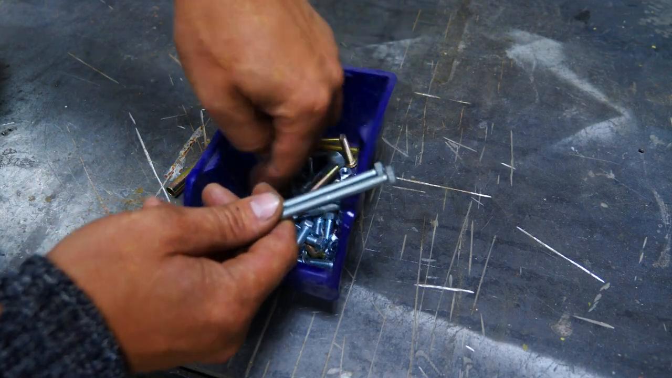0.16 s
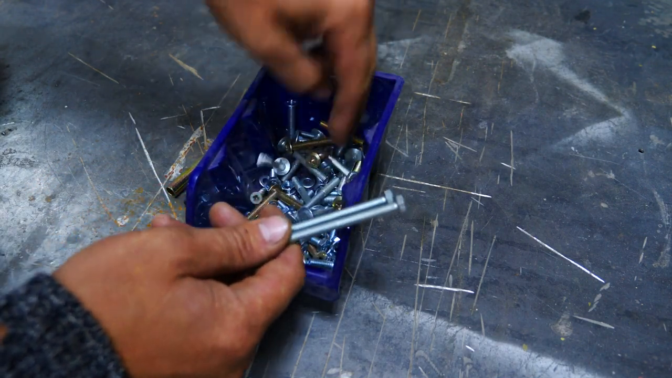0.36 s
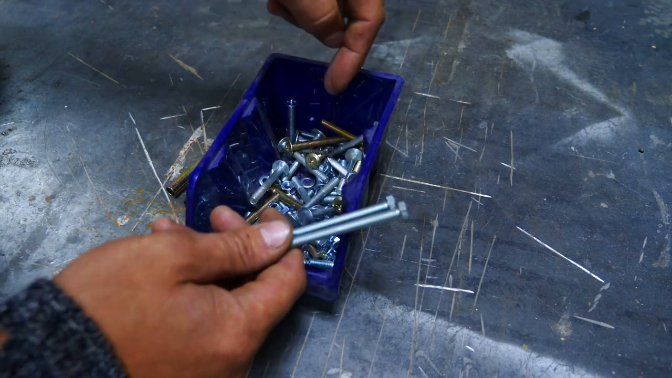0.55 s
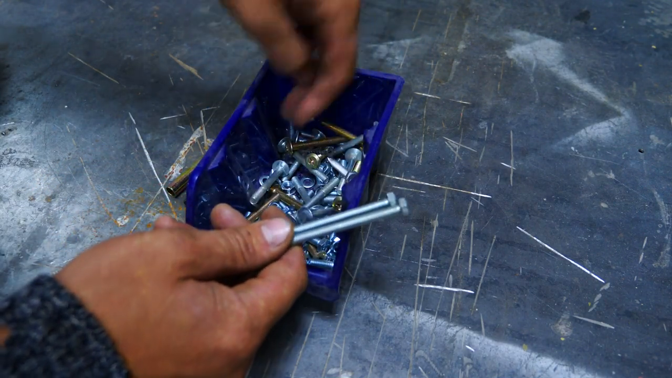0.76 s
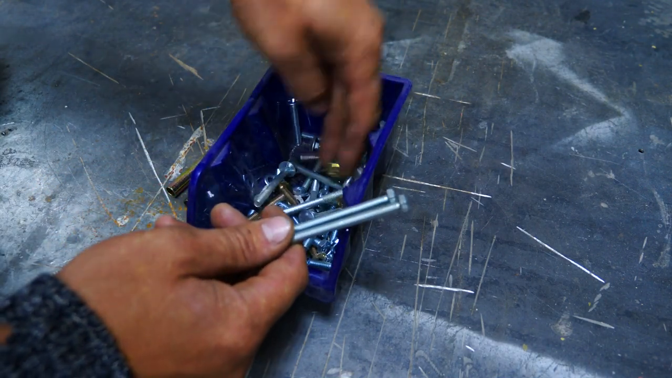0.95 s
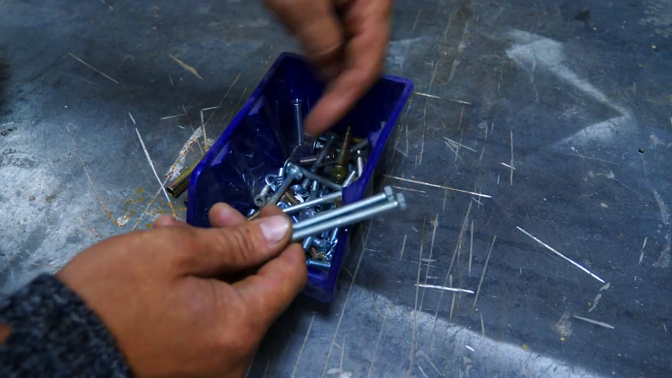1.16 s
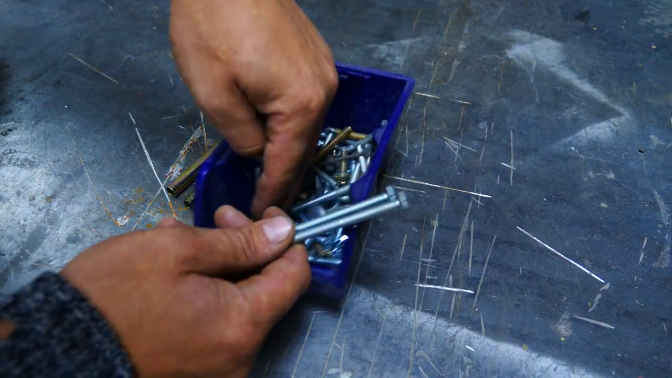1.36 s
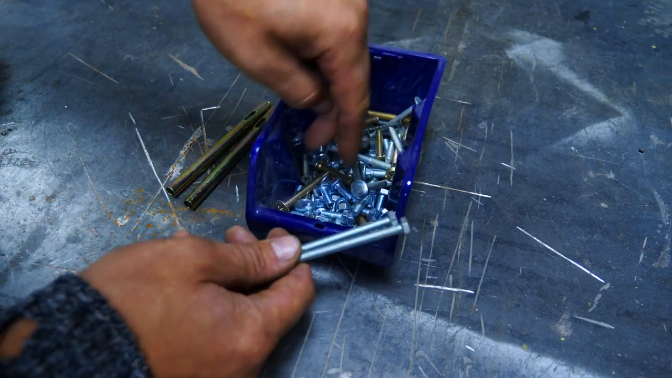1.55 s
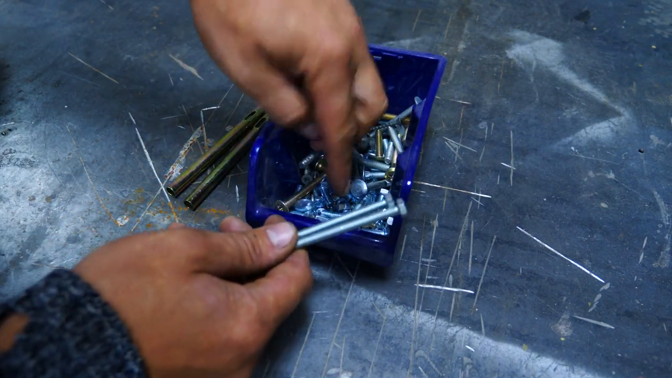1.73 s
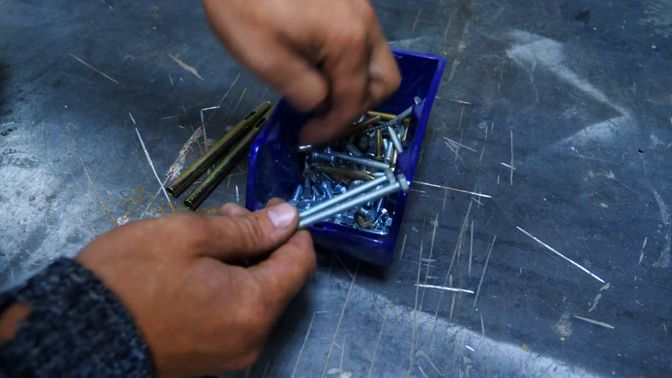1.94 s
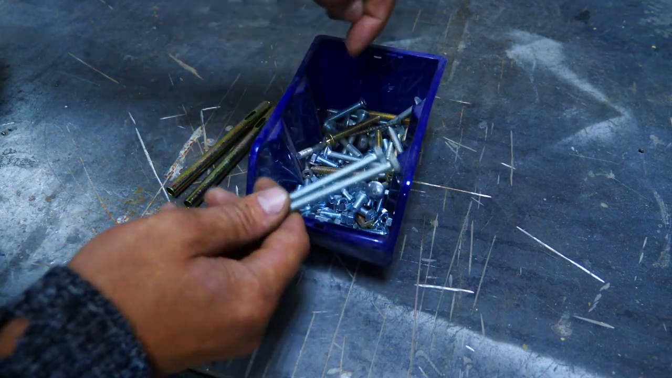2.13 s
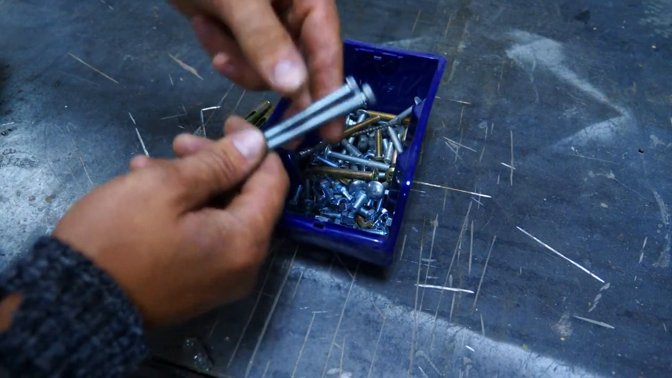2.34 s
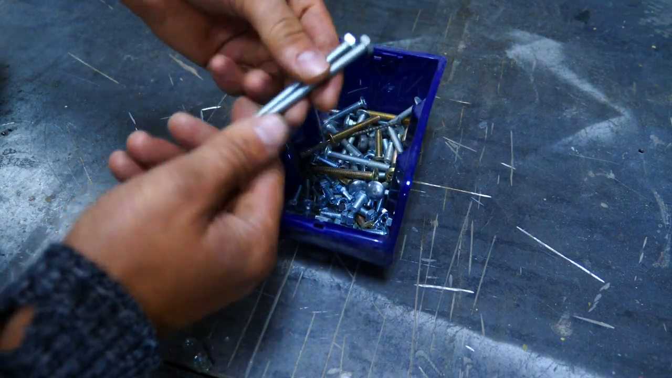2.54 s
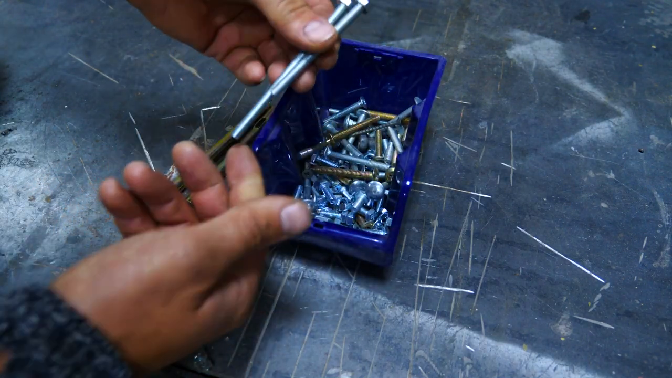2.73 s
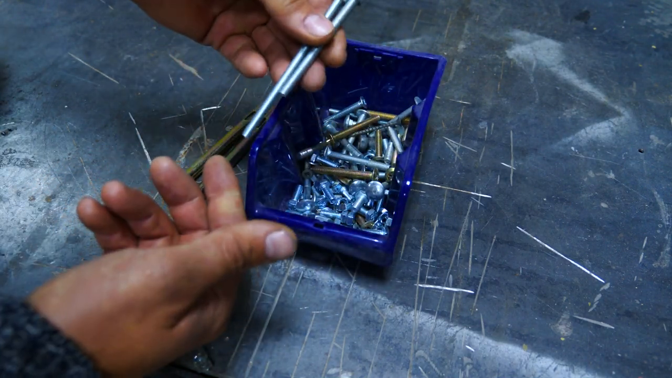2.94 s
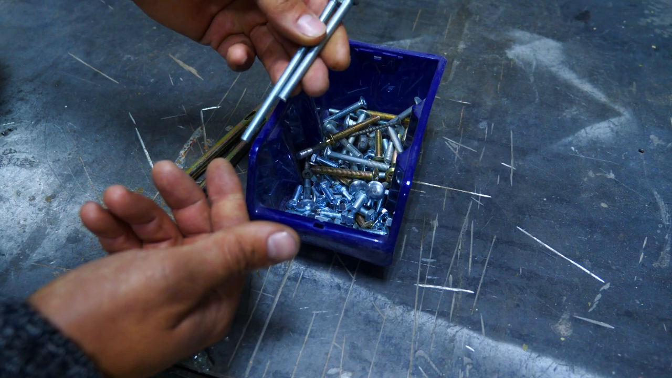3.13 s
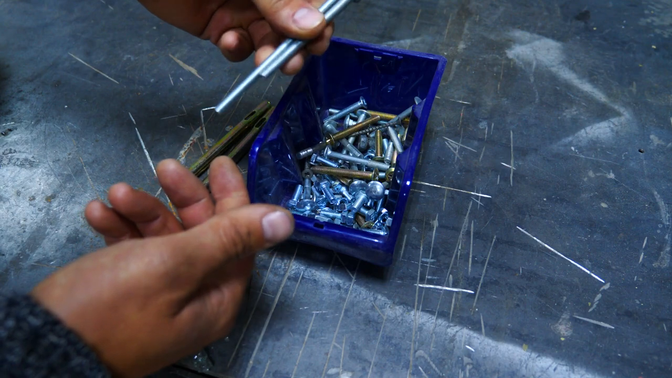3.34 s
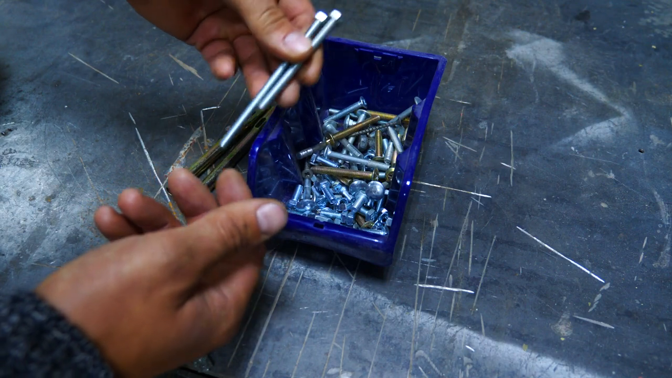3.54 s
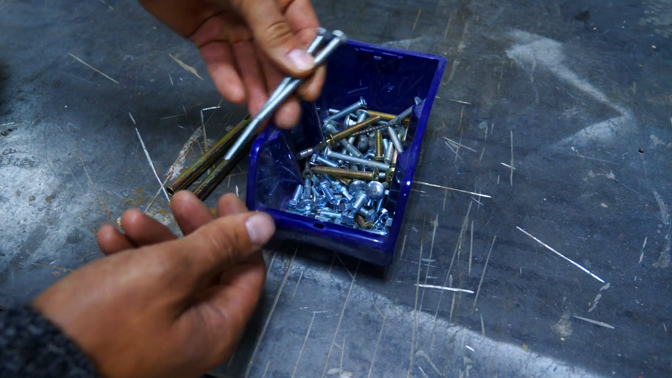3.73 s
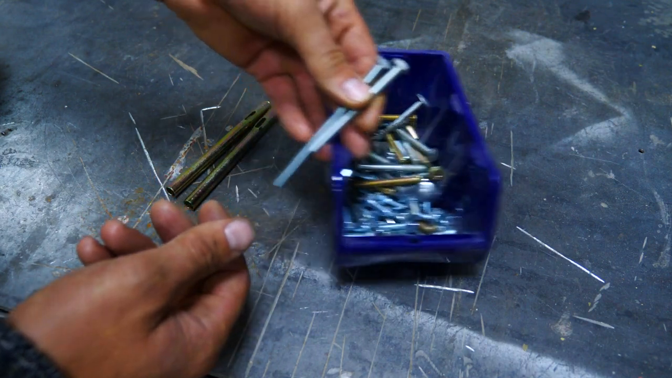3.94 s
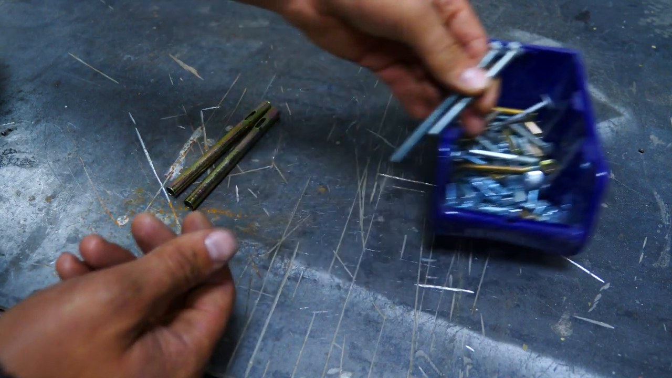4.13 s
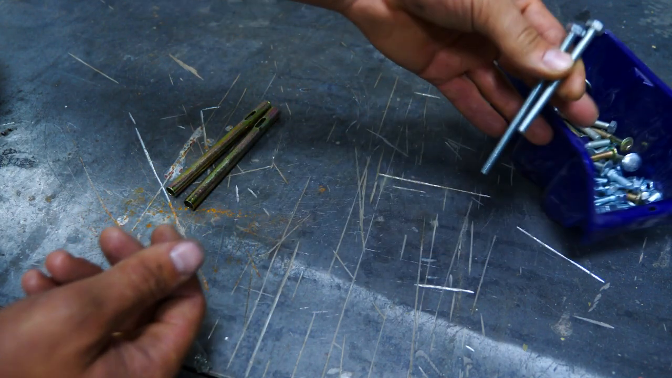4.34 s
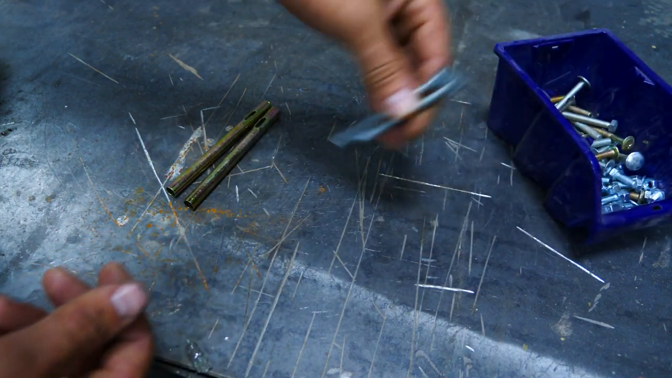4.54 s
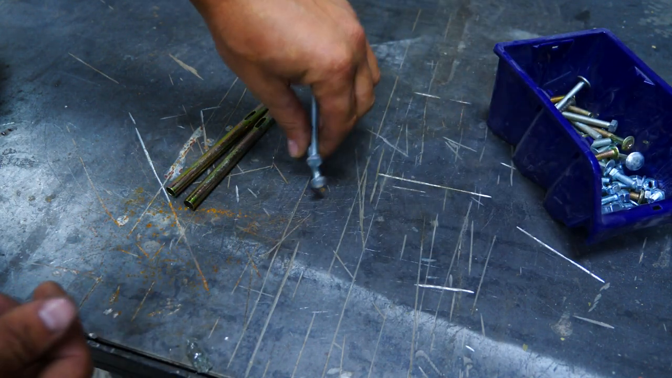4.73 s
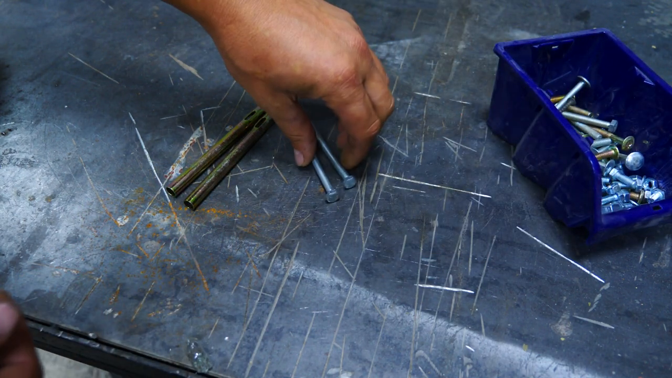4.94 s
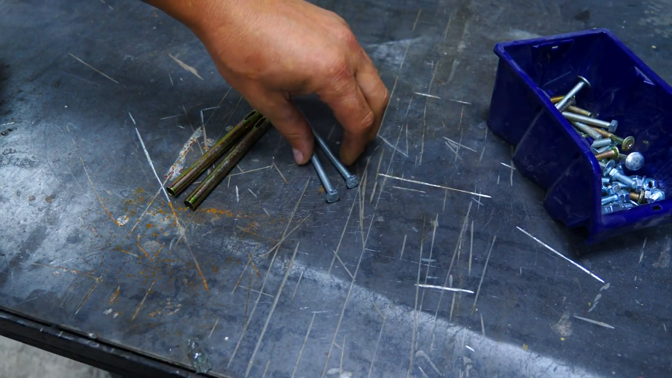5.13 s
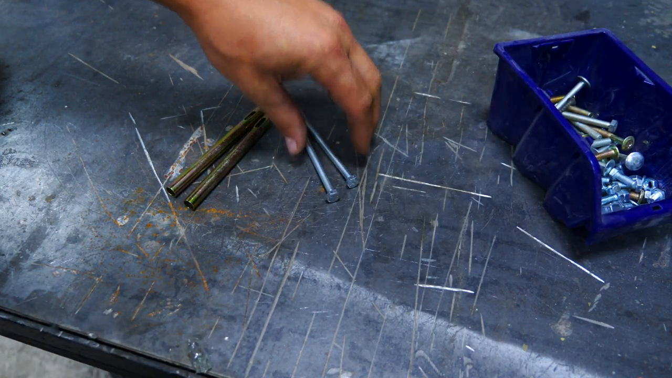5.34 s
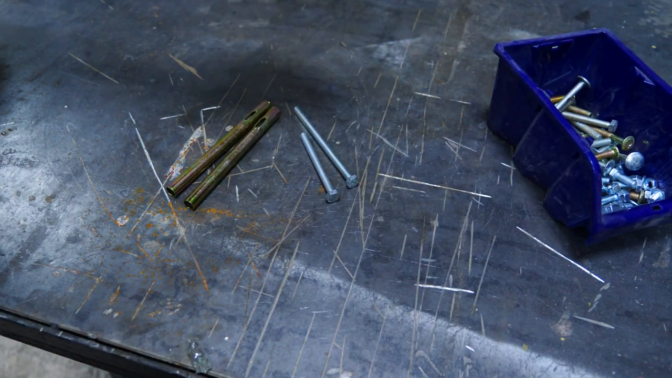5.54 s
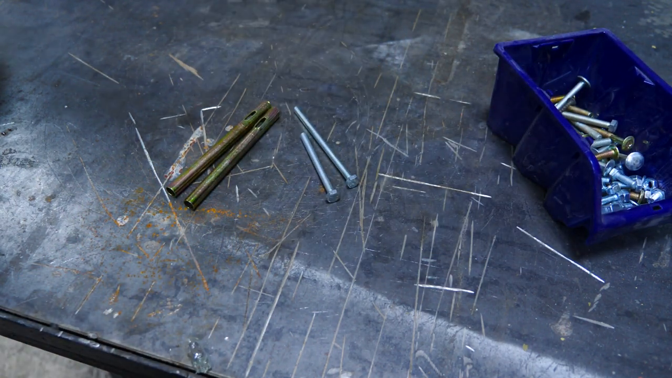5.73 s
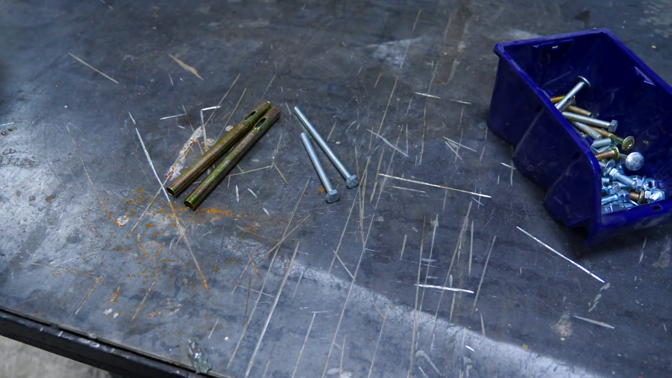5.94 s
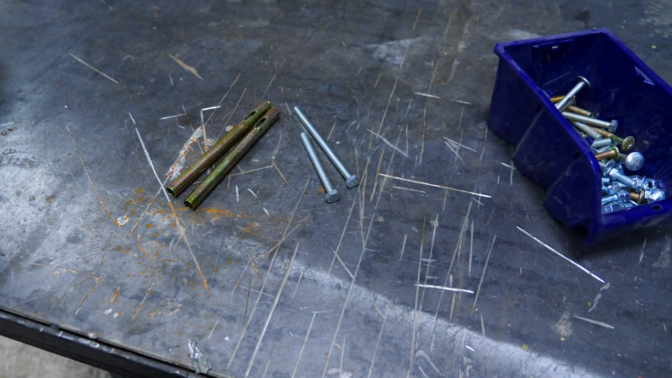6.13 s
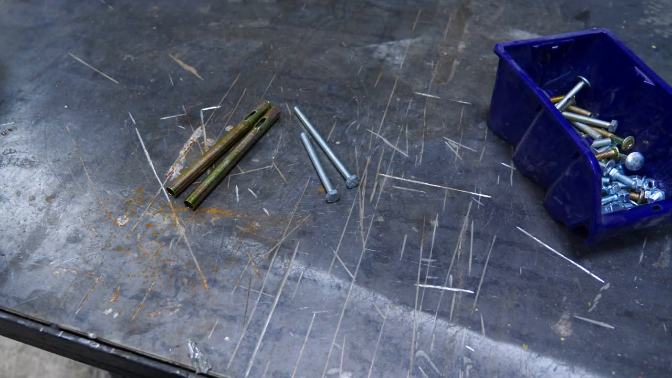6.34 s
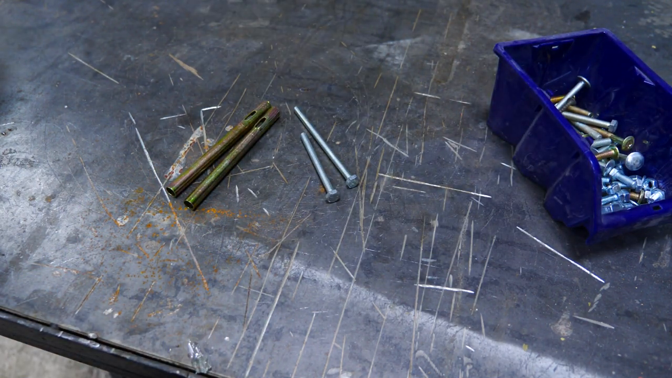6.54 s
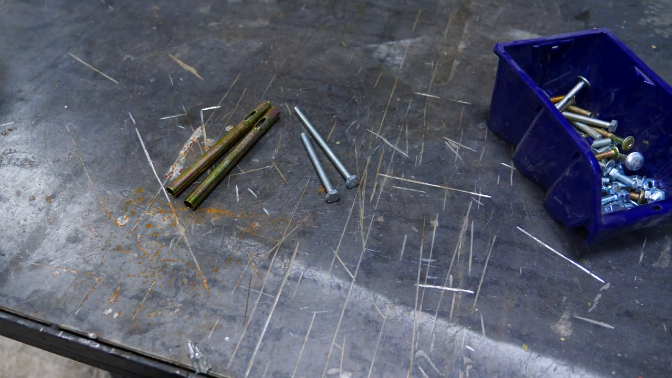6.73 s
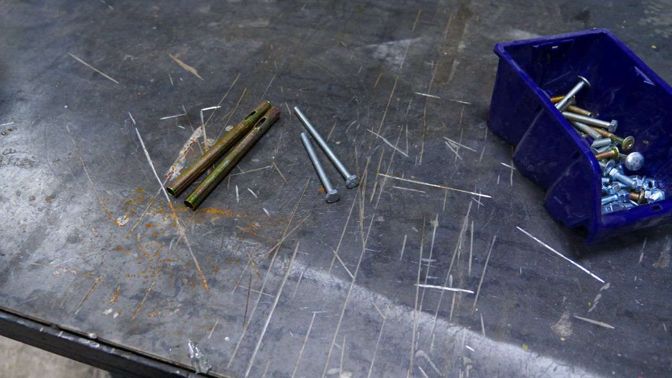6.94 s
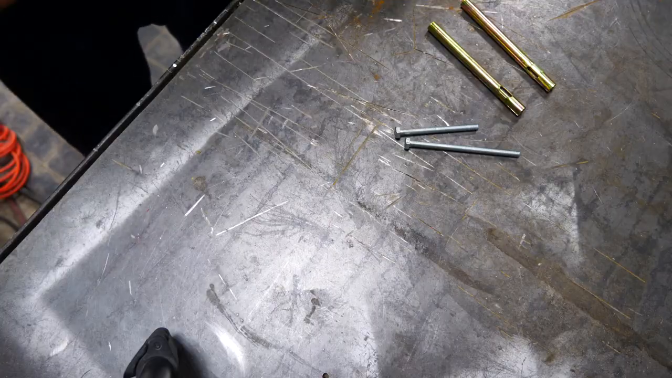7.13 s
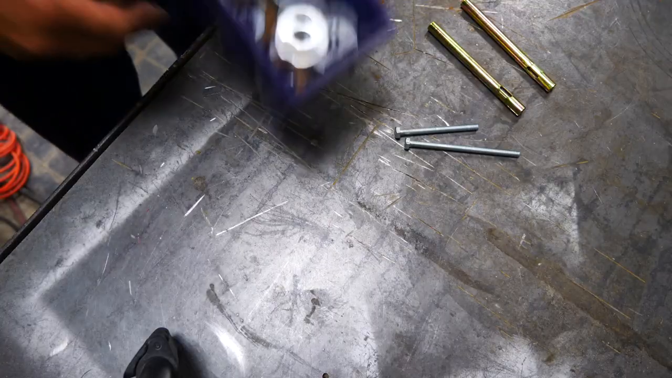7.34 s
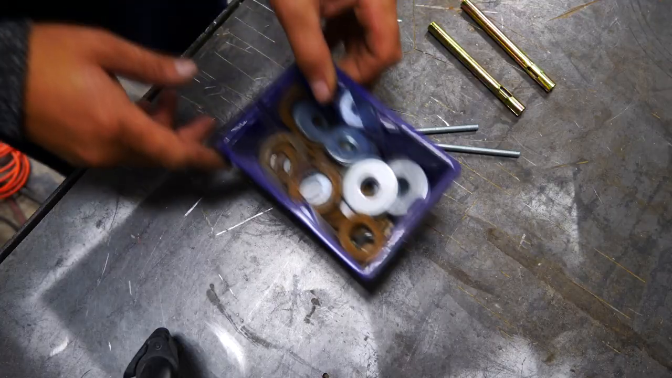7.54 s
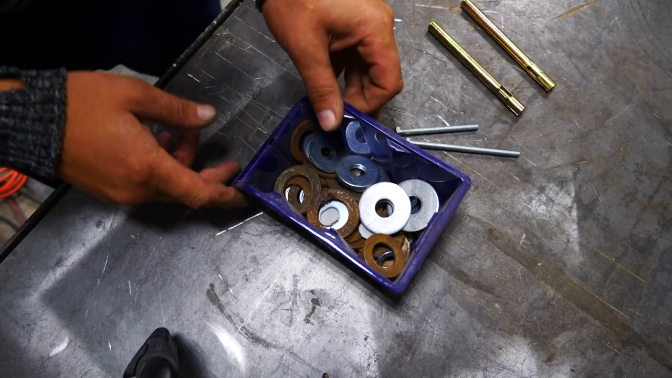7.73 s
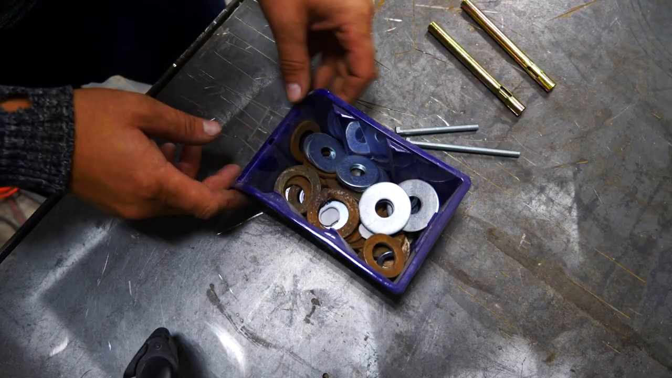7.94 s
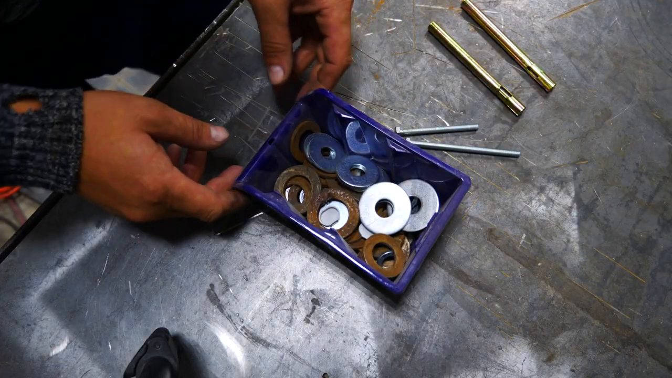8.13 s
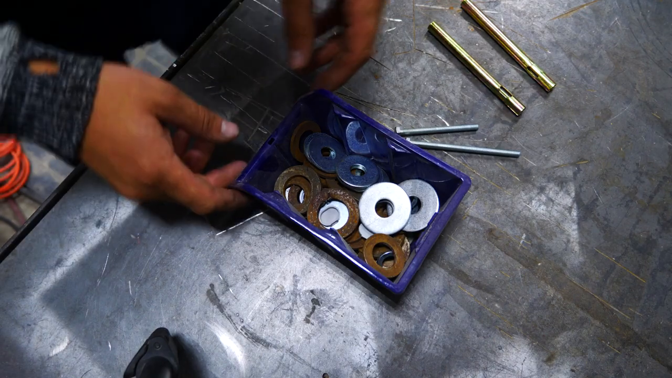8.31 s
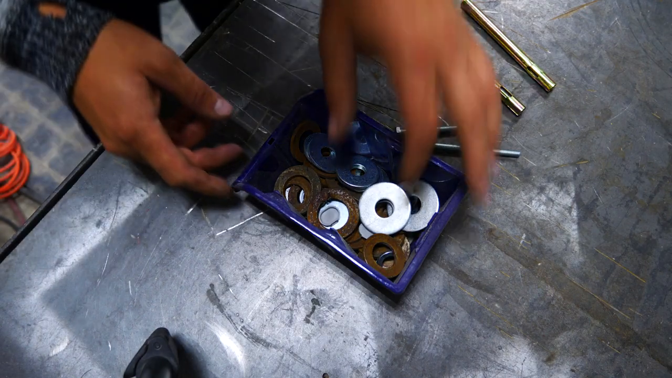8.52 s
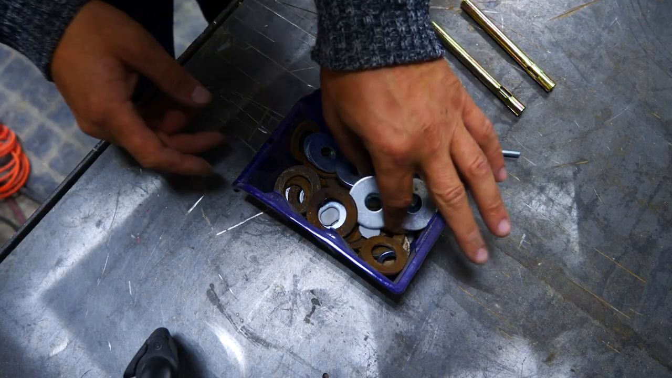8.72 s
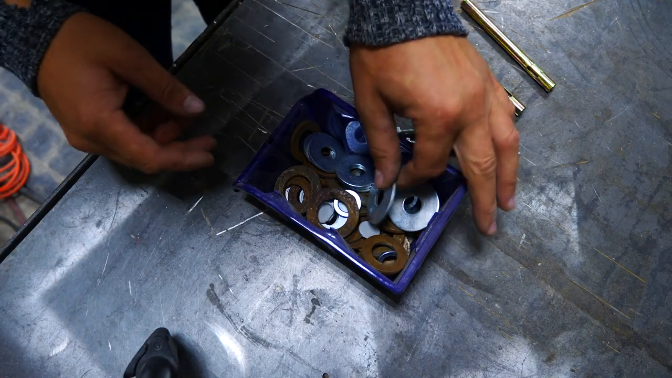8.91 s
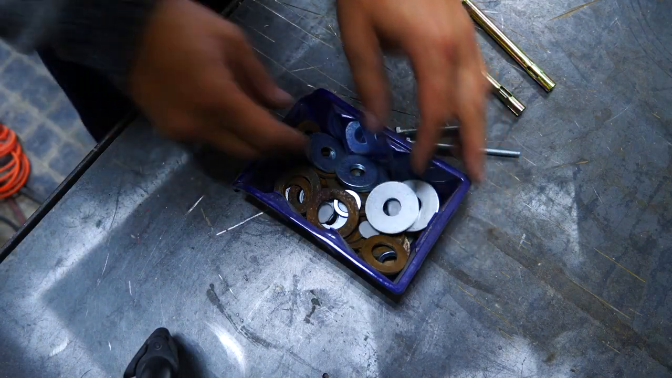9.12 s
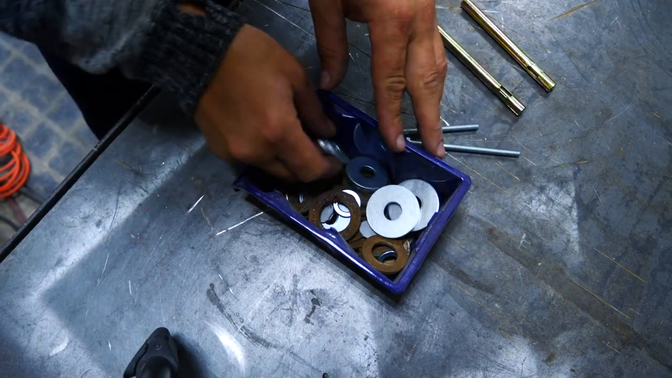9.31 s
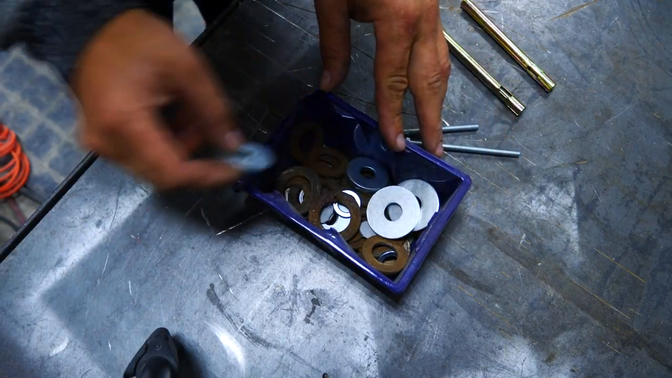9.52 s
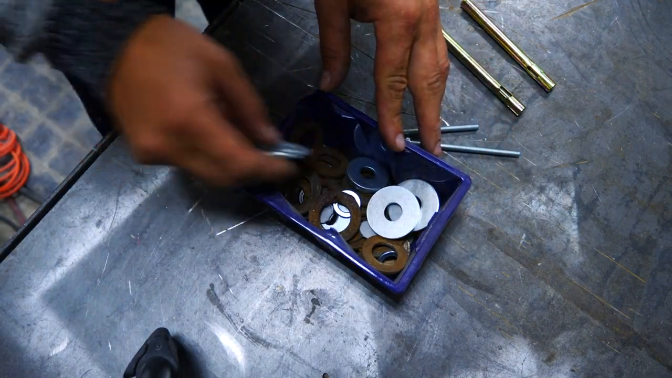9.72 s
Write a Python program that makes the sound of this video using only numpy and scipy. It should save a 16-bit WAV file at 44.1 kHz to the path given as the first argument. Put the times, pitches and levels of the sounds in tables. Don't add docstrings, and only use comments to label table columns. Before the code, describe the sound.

Close to the microphone in a small hard workshop, a hand digs noisily through bolts in a plastic bin for two seconds. Two held bolts tap, then near quiet. The bin scrapes aside on the steel bench, two long bolts drop with a bright ring, and after a pause a bin of washers lands and is picked through in thin clinks.

```python
import sys
import numpy as np
from scipy import signal
from scipy.fft import rfft, irfft, next_fast_len
from scipy.io import wavfile
from scipy.ndimage import uniform_filter1d, map_coordinates

SR = 44100
rng = np.random.default_rng(int(sys.argv[2]) if len(sys.argv) > 2 else 0)


def digitize_waveform(pressure):
    field = np.atleast_2d(pressure).T
    bounded = np.clip(field, -1, 1)
    quanta = np.round(bounded * 32767).astype(np.int16)
    wavfile.write(sys.argv[1], SR, quanta)


def gain_from_db(level_db):
    decades = np.asarray(level_db, float) / 20
    return 10 ** decades


N = 435266

# (frequency [Hz], density [dB per Hz])
AIR_TONE = [(18, -70.5), (118, -8), (291, -12.5), (400, -10.5), (3130, -12), (14500, -21.5), (16500, -31)]
# (frequency [Hz], decay time t60 [s])
SHOP_T60 = [(100, 0.75), (400, .55), (2000, 0.55), (5000, 0.48), (14000, 0.19)]
# (frequency [Hz], likeness [0..1])
ALIKE = [(60, 0.91), (180, 1), (550, 1), (1650, 0.24), (4970, 0.77), (15000, 0.93)]
# (frequency [Hz], level [dB])
SPREAD = [(300, -38.5), (800, -21), (1500, -16), (5000, -10.5), (9000, -17), (15000, -17.5)]

# (start [s], peak [s], end [s], level [dB], brightness [dB])
SLEEVE = [
    (5.37, 5.4, 5.47, -74.5, 16),
    (5.66, 5.78, 5.95, -71, 9),
    (6.1, 6.5, 6.66, -71.5, 13.5),
]
# (start [s], peak [s], end [s], level [dB], brightness [dB])
FINGERS = [(2.5, 2.77, 3.15, -65.5, 7.5), (6.95, 6.97, 7.07, -71.5, 8), (7.1, 7.176, 7.28, -68.5, -11.5),
           (7.3, 7.46, 7.52, -65, 2.5), (7.9, 7.972, 8.06, -65.5, 10.5), (8.08, 8.21, 8.31, -65.5, 8.5),
           (8.27, 8.34, 8.58, -59, 5), (8.48, 8.58, 8.7, -59, 7.5), (9.54, 9.56, 9.83, -63.5, -1)]
# (frequency [Hz], density [dB per Hz])
CLOTH_TONE = [(59, -46.5), (100, -13.5), (1440, -8.5), (1570, 3.5), (4390, 3.5), (13300, -1), (15500, -2),
              (16500, -28.5)]
SKIN_TONE = [(59, -57), (100, -11.5), (338, -1.5), (418, 0.5), (1090, 2.5), (2410, -1), (3620, -3.5),
             (6450, -7), (15100, -18.5), (16500, -29)]

# (time [s], peak level [dB])
THUMPS = [(0.2, -42.5), (0.511, -45), (0.909, -41.5), (1.387, -33), (1.52, -34), (1.912, -47.5),
          (3.699, -49.5), (4.449, -45.5), (7.118, -52), (7.729, -40)]
# (time [s], level [dB], frequency [Hz], t60 [s])
BENCH_HUMS = [
    (6.085, -52.5, 399.3, 0.06),
    (7.117, -59, 415, 0.75),
    (7.85, -66.5, 412, 6.9),
    (9.521, -31.5, 414, 0.026),
]
# (time [s], level [dB], frequency [Hz], t60 [s])
CHIMES = [(6.957, -58, 4950, .2), (2.42, -57, 12150, .25), (1.2, -37.5, 8100, .3), (8.795, -35, 6530, .2),
          (7.561, -49, 1239, .29), (7.58, -54, 2281, .18), (7.966, -54, 2221, .17), (8.56, -58, 2350, .3),
          (3.59, -63, 2200, .12)]
# (time [s], level [dB], frequency [Hz], t60 [s])
TWINS = [
    (5.004, -36, 6192, .7),
    (5.004, -38, 6194.6, .7),
    (4.99, -28, 12140, .45),
    (5.03, -28, 12147, .45),
    (4.95, -24, 11200, .2),
]

# (time [s], peak level [dB])
TAPS = [
    (2.4103, -19.5),
    (2.4165, -22),
    (2.421, -22.5),
    (2.4956, -27.5),
    (2.501, -30),
    (2.51, -42),
]
# (frequency [Hz], level [dB], t60 [s])
TAP_NOTES = [(2300, -21.5, 0.012), (6600, -7.5, 0.0042), (12170, -1, 0.014)]

# (time [s], level
# [dB], frequency [Hz])
RINGS_HEAP = [(0.036, -24.0, 12815), (0.051, -20.0, 14117), (0.058, -24.0, 3504), (0.118, -31.0, 3334),
              (0.135, -27.0, 4489), (0.184, -27.0, 4220), (0.241, -28.0, 12808), (0.267, -30.0, 13292),
              (0.295, -30.0, 9446), (0.376, -25.0, 3564), (0.382, -28.0, 6323), (0.383, -28.0, 5109),
              (0.91, -30, 3565), (0.962, -29, 7058), (0.968, -31.5, 8506), (0.971, -23.0, 6373),
           (0.985, -28.5, 7546), (1.093, -27, 9302), (1.486, -29, 8131), (1.511, -27.0, 7410),
           (1.557, -29.5, 11081), (1.583, -32.0, 6893), (1.9, -25.5, 7018)]
RINGS_SLIDE = [(3.975, -24.5, 7441), (3.981, -26.5, 5110), (4.043, -26, 3982), (4.133, -26.0, 8525),
               (4.197, -24.0, 7121), (4.268, -25.5, 12872), (4.301, -27.5, 10565), (4.345, -28.5, 3647),
               (4.364, -26, 5075)]
RINGS_DROP = [(4.946, -26.0, 12961), (4.985, -17.0, 13006), (4.986, -23.0, 13988), (5.024, -22.0, 11194),
              (5.046, -20.0, 12144), (5.058, -27.0, 10283), (5.066, -26.0, 13000)]
RINGS_PICK = [(8.786, -36.0, 10516), (8.799, -32.0, 13561), (8.821, -29.0, 15101), (8.821, -27.0, 11595),
              (8.863, -29.0, 10259), (8.887, -31.0, 12879), (8.893, -17.0, 9523), (8.898, -32.0, 15130),
              (9.124, -27.0, 9806), (9.215, -22.0, 9827), (9.291, -22.0, 9964), (9.294, -26.0, 11627),
              (9.297, -33.0, 12906), (9.349, -32.0, 11879), (9.359, -29.0, 11623), (9.381, -27.0, 9791),
              (9.842, -29.0, 12412)]
# (time [s], level [dB], frequency [Hz])
SPARKS = [(.0797, -12.5, 12900), (.2718, -14, 12800), (.392, -17, 9210), (.5117, -11, 14200),
          (.6055, -25.5, 9480), (1.0146, -15.5, 9760), (1.076, -16.5, 12900), (1.3942, -17.5, 13000),
          (1.6571, -10, 12900), (1.6651, -9, 12500), (1.672, -10.5, 14000), (1.7549, -20.5, 13100),
          (1.9709, -14, 15400), (2.0413, -18, 15200)]
# (start [s], peak [s], end [s], knock [dB], steel over knock [dB])
GRATE = [
    (3.872, 3.88, 3.925, -38.5, -21),
    (4.026, 4.076, 4.22, -29.5, -19.5),
    (4.236, 4.3, 4, -36, -20),
]

# (frequency [Hz], density [dB per Hz])
HEAP_TONE = [(35, -65.5), (70, -49.5), (108, -24), (270, -14), (412, -10), (777, -10), (1160, -4.5),
             (1610, -9), (2460, -2.5), (3750, 1), (13000, -13), (15400, -14), (16500, -47)]
SLIDE_TONE = [(35, -65), (70, -30), (442, 1.5), (916, -2), (1160, -10.5), (1500, -5), (1990, -4),
              (3180, -5.5), (13000, -6), (15400, -7.5), (16500, -40)]
DROP_TONE = [(35, -60), (60, -39.5), (573, -15.5), (742, -14.5), (2090, -12), (5220, -2), (12400, 0),
             (15400, -7.5), (16500, -32)]
PICK_TONE = [(35, -59.5), (70, -14.5), (453, -2), (777, -4.5), (1240, 0), (1770, -5.5), (3110, 1.5),
             (8750, -19), (9840, -6), (15400, -10.5), (16500, -39)]
SET_TONE = [(35, -57.5), (60, -23), (318, -7.5), (534, -12), (675, -3), (759, -11.5), (1610, -7.5),
            (5470, -17), (14300, -24.5), (16500, -45.5)]
# (frequency [Hz], width [Hz], gain [dB])
BIN = [(1180, 260, 12), (2140, 570, 19), (2970, 350, 7.5)]
BIN_FLOOR = [(440, 28, 13), (653, 31, 15), (745, 98, 18)]
# (frequency [Hz], level [dB], t60 [s])
LONG_BOLTS = [(6191, -24, .2), (11190, -4, .1), (12140, -8, .2)]
HELD_BOLTS = [(2210, -8, .03), (4770, -16, .03), (6050, -8, .03), (6350, -4, .03), (11400, -6, .03),
              (11800, -5, .04), (12200, 0, .05)]

# (start [s], let go [s], end [s], knock [dB], steel over knock [dB])
DIGS = [
    (0.0, .46, .8, -26, -2),
    (.905, 1.07, 1.378, -21.5, -1),
    (1.386, 1.6, 1.88, -24, -1),
    (1.88, 1.96, 2.14, -27.5, 0.5),
    (3.7, 3.74, 4.6, -48, -7),
    (3.878, 3.89, 3.96, -33.5, -12.5),
    (4.025, 4.1, 4.135, -25, -9),
    (9.842, 9.868, 9.87, -31, 5.5),
]
# (start [s], peak [s], end [s], knock [dB], steel over knock [dB])
HEAP = [
    (3.8, 3.87, 3.9, -38, -8),
    (7.5, 7.57, 7.7, -52, 0),
]
# (time [s], peak level [dB], steel tick [dB], chatter [s])
HEAP_STARTS = [
    (0.516, -6, -18, 0.019),
    (7.46, -40, -49.5, 0.042),
    (7.49, -42.5, -49, 0.03),
]
# (time [s], speed as level [dB])
SLIDE = [
    [(3.88, -40.5), (3.93, -28), (4.01, -22.5), (4.06, -26.5), (4.122, -28.5), (4.15, -22.5), (4.376, -22),
     (4.442, -29.5), (4.53, -51.5)],
]
# (time [s], effort as level [dB])
PICK = [
    [(8.715, -46.5), (8.786, -28.5), (8.857, -38), (8.929, -29.5), (9.0, -53.5)],
    [(9.111, -37.5), (9.29, -29.5), (9.335, -40), (9.37, -27.5), (9.496, -52), (9.56, -81)],
]
# (start [s], slowing [s], end [s], knock [dB], steel over knock [dB])
DROP = [
    (4.947, 5.11, 5.36, -31, 4.5),
]
# (time [s], peak level [dB], steel tick [dB])
LONG_BLOWS = [
    (4.945, -7.5, -8),
    (4.985, -5.5, -10.5),
    (5.024, -22, -17),
    (5.069, -34, -18.5),
    (5.089, -17, -21.5),
]
# (start [s], peak [s], end [s], knock [dB], steel over knock [dB])
ROLL = [
    (2.982, 2.992, 3.0, -76, 9),
    (3.04, 3.085, 3.11, -72, 8),
    (3.275, 3.32, 3.39, -77, 7),
    (3.555, 3.595, 3.615, -74, 6),
]
# (time [s], peak level [dB], steel tick [dB], chatter [s])
HELD_BLOWS = [
    (3.048, -53, -49.5, 0.023),
    (3.381, -53, -46.5, 0.031),
    (3.402, -58, -52, 0.028),
    (4.628, -64, -47.5, 0.045),
]
# (time [s], peak level [dB], steel tick [dB], chatter [s])
SET_DOWN = [
    (3.699, -25, -46, 0.11),
    (3.784, -22.5, -52, 0.058),
    (4.984, -7.5, -45, .01),
    (6.956, -49, -41.5, 0.1),
    (7.117, -29.5, -46.5, 0.17),
    (7.154, -35.5, -71, 0.05),
    (7.728, -5.5, -29.5, 0.11),
    (7.769, -16.5, -33.5, 0.18),
]
# (time [s], peak level [dB], bin-wall note [Hz], steel note [Hz], steel level [dB])
CLINKS_A = [(0.0626, -6, 1152, 4640, -13), (0.145, -8.5, 2527, 4218, -26.5),
            (0.1915, -9.5, 2430, 5130, -22.5), (0.1999, -3, 1177, 4330, -21),
            (0.2742, -2.5, 2090, 5070, -11), (0.3793, -9, 2510, 5200, -20.5),
            (0.413, -6.5, 2480, 4340, -21.5), (0.5037, -5, 1016, 5600, -22.5),
            (0.5111, -1.5, 2365, 4780, -18.5), (0.9079, -11.5, 990, 6360, -22),
            (0.9125, -7, 1180, 5200, -16), (0.9501, -5, 1050, 4200, -19), (1.0504, -5.5, 2477, 4130, -20),
            (1.1232, -4, 2500, 9700, -21), (1.2595, -21, 1125, 9390, -33), (1.3104, -20, 2840, 5700, -30.5),
            (1.3341, -16.5, 1206, 6900, -29)]
CLINKS_B = [(1.3849, -12.5, 2040, 8175, -27), (1.3907, -9.5, 2320, 8200, -24),
            (1.4221, -0.5, 2830, 5264, -16.5), (1.5214, -7, 2050, 4770, -21),
            (1.565, -8.5, 2240, 8280, -17.5), (1.6557, -3, 1250, 11710, -15), (1.6951, -9, 1180, 4900, -17),
            (1.7175, -1.5, 2290, 5516, -20), (1.7583, -10.5, 2300, 4624, -26.5),
            (1.7877, -9, 2350, 5110, -34), (1.8257, -13, 2240, 4600, -31.5), (1.888, -9, 2720, 4693, -22),
            (1.905, -2.5, 2860, 5027, -15), (1.9545, -7, 2970, 4660, -21),
            (1.9739, -0.5, 2290, 4746, -20.5), (2.057, -7, 2160, 4090, -18.5)]
CLINKS_SLIDE = [(3.7013, -28.5, 2230, 5246, -40.5), (3.7846, -25, 2215, 5660, -45.5),
                (3.7927, -25, 2107, 4290, -50), (3.8676, -15.5, 2120, 4870, -33),
                (3.8725, -1.5, 2220, 5326, -26), (4.1342, -8, 3990, 5890, -15.5),
                (4.1734, -9, 2113, 6130, -21), (4.2405, -6.5, 2604, 5535, -18),
                (4.343, -12, 3874, 4784, -17), (4.3696, -14, 3510, 6296, -20)]
CLINKS_PICK = [(8.7288, -28, 2120, 4200, -38), (8.7423, -19, 2310, 4660, -39.5),
               (8.7586, -15, 2520, 9820, -34.5), (8.8205, -26, 1440, 11600, -23),
               (8.8651, -5.5, 1290, 10250, -19), (8.8861, -7, 1230, 12100, -18.5),
               (8.8948, -9, 1300, 9590, -18), (8.9322, -12, 3070, 12360, -17),
               (9.1101, -10, 1610, 9800, -21.5), (9.1377, -14, 1450, 9650, -27),
               (9.1674, -9, 1560, 10230, -21.5), (9.2141, -9.5, 1560, 9880, -22.5),
               (9.2439, -12, 2380, 11900, -22.5), (9.2544, -7.5, 2300, 9870, -17),
               (9.2928, -7, 2410, 9890, -18.5), (9.3608, -8, 2450, 11500, -25),
               (9.3912, -7.5, 2340, 9800, -27.5), (9.438, -7.5, 2970, 14500, -20),
               (9.5086, -27, 2270, 12800, -42.5), (9.8412, 3.5, 2244, 13730, -16.5)]
CLINKS_HOLLOW = [(0.011, -19, 1246, 12800, -18), (0.0786, -17.5, 1180, 12700, -19.5),
                 (0.221, -17, 1180, 12400, -24.5), (0.2453, -18.5, 1130, 12820, -22),
                 (0.2898, -16, 1250, 13300, -16.5), (0.3343, -18, 1218, 13220, -26),
                 (4.0304, -26, 1150, 10420, -25), (4.0651, -19, 1230, 11800, -24.5),
                 (4.081, -17, 1180, 13800, -25)]


def unit(x):
    return x / np.sqrt(np.mean(x ** 2) + 1e-20)


def along(points, hz):
    f, value = np.transpose(points)
    return np.interp(np.log(hz + 1), np.log(f + 1), value)


def add(out, s, x, pan_db):
    part = out[:, round(s * SR):][:, :x.shape[-1]]
    panned = x * gain_from_db([[pan_db / 2], [-pan_db / 2]])
    part += panned[:, :part.shape[1]]


def decay(t, t60):
    return gain_from_db(-60 * t / t60)


def onset(t, rise_s):
    return 1 - np.exp(-t / rise_s)


def sine(hz, t):
    return np.sin(2 * np.pi * hz * t)


def pair(n, like):
    mid, side = rng.standard_normal((2, n)) * np.sqrt([[1 + like], [1 - like]])
    return np.array([mid + side, mid - side]) / np.sqrt(2)


def clumps(n, rate, depth_db):
    knots = rng.standard_normal(int(n * rate / SR) + 4)
    return gain_from_db(depth_db * map_coordinates(knots, [np.arange(n) * rate / SR]))


def contacts(n, rate, spread_db):
    chance, sign, size = rng.random((3, n))
    return (chance < rate / SR) * np.sign(sign - .5) * gain_from_db(-spread_db * np.log(size + 0.0026))


def wall_gain(hz, walls):
    return 1 + sum(gain_from_db(db) / np.hypot(1, 2 * (hz - centre) / width) for centre, width, db in walls)


def halves(tone, split_hz, walls=()):
    hz = np.fft.rfftfreq(4096, 1 / SR)
    low = 1 / (1 + (hz / split_hz) ** 4)
    gain = gain_from_db(along(tone, hz)) * np.sqrt([low * wall_gain(hz, walls) ** 2, 1 - low])
    ceps = irfft(np.log(gain + 1e-6))
    ceps[:, 1:2048] *= 2
    ceps[:, 2049:] = 0
    h = irfft(np.exp(rfft(ceps)))[:, :2048]
    return h / np.linalg.norm(h, axis=1, keepdims=True)


def swells(rows, rise_db, fall_db, swing):
    return [[(s, db - rise_db, db + up - swing * rise_db),
             (top, db, db + up),
             (end, db - fall_db, db + up - swing * fall_db)]
            for s, top, end, db, up in rows]


def air():
    m = next_fast_len(N)
    spectrum = rfft(pair(m, 0.74)) * gain_from_db(along(AIR_TONE, np.fft.rfftfreq(m, 1 / SR)))
    return gain_from_db(-67) * unit(irfft(spectrum, m)[:, :N])


def shop(x):
    hz, t, z = signal.stft(rng.standard_normal((2, SR * 2 // 3)), SR, nperseg=256)
    turn = np.arccos(np.clip(along(ALIKE, hz), -1, 1))[:, None] / 2
    mid, side = z[0] * np.cos(turn), z[1] * np.sin(turn)
    dying = np.array([mid + side, mid - side]) * decay(t, along(SHOP_T60, hz)[:, None])
    tail = signal.istft(dying, SR, nperseg=256)[1]
    delayed = np.pad(x, (150, 0))
    return signal.fftconvolve(delayed[None], tail / np.linalg.norm(tail[0]), axes=1)[:, :N]


def close_echoes(x):
    taps_n = 1024
    echo = rng.standard_normal(taps_n) * decay(np.arange(taps_n) / SR, .03)
    colour = gain_from_db(along(SPREAD, np.fft.rfftfreq(taps_n, 1 / SR)))
    echo = irfft(rfft(echo / np.linalg.norm(echo)) * colour)
    return signal.fftconvolve(x, echo)[:N] * [[1], [-1]]


def brush(spans, tone, pan_db):
    out, tones = np.zeros((2, N)), halves(tone, 1290)
    for rows in spans:
        s, *levels = np.transpose(rows)
        t = np.arange(s[0], s[-1], 1 / SR)
        grain = pair(len(t), 0.92) + 0.53 * unit(contacts(len(t), 800, 3.1))
        grain *= clumps(len(t), rate=45, depth_db=0.55)
        bands = [signal.fftconvolve(grain * gain_from_db(np.interp(t, s, db)), h[None])
                 for db, h in zip(levels, tones)]
        add(out, s[0], sum(bands), pan_db)
    return out


def sleeves():
    cuffs = brush(swells(SLEEVE, rise_db=3, fall_db=3.5, swing=4.4), CLOTH_TONE, pan_db=5.5)
    return cuffs + brush(swells(FINGERS, rise_db=7, fall_db=6.0, swing=1.26), SKIN_TONE, pan_db=3.0)


def bench():
    out, t = np.zeros((2, N)), np.arange(SR) / SR
    for s, db, hz, t60 in BENCH_HUMS + CHIMES + TWINS:
        add(out, s, gain_from_db(db) * decay(t, t60) * sine(hz, t) * onset(t, 0.0013), 0)
    for s, db in THUMPS:
        thump = sine(118, t) + .5 * sine(205, t) + 0.24 * np.exp(-t / .006)
        add(out, s, gain_from_db(db - 8.0) * decay(t, 0.52) * thump, 0)
    return out


def taps():
    out, t = np.zeros((2, N)), np.arange(SR // 20) / SR
    for s, db in TAPS:
        x = sum(gain_from_db(level) * decay(t, t60) * sine(hz, t) for hz, level, t60 in TAP_NOTES)
        x += np.diff(rng.standard_normal(len(t) + 1)) * gain_from_db(-11.5) * decay(t, .009)
        add(out, s, gain_from_db(db + 3) * x * onset(t, 0.00024), 2.2)
    return out


def rings(rows, level_db, t60, attack_s):
    out, t = np.zeros((2, N)), np.arange(SR // 3) / SR
    for s, db, hz in rows:
        shake = .35 * np.log(clumps(len(t), rate=45, depth_db=9))
        note = gain_from_db(db + level_db) * decay(t, t60) * np.sin(2 * np.pi * hz * t + shake)
        add(out, s, note * onset(t, attack_s), rng.normal(.4, .8))
    return out


def loose_parts():
    notes = rings(RINGS_HEAP, level_db=1.0, t60=.16, attack_s=0.0014)
    notes += rings(RINGS_SLIDE, level_db=-0.5, t60=.22, attack_s=.003)
    notes += rings(RINGS_DROP + RINGS_PICK, level_db=-0.5, t60=.12, attack_s=0.0011)
    notes += rings(SPARKS, level_db=-1, t60=0.0091, attack_s=.0004)
    grating = swells(GRATE, rise_db=9.5, fall_db=7.5, swing=1.1)
    return notes + stir(grating, SLIDE_TONE, walls=BIN_FLOOR, rate=1500, spread_db=4.0,
                        ring_rate=120, odd_db=-41, pan_db=0.4)


def ring(hz, t60, x):
    r, turn = gain_from_db(-60 / (max(t60, .005) * SR)), 2 * np.pi * hz / SR
    scale = np.sqrt(2 * (1 - r * r)) * np.sin(turn)
    return scale * signal.lfilter([1], [1, -2 * r * np.cos(turn), r * r], x)


def odd_parts(tone, walls, count):
    hz = 1000 * 15 ** ((np.arange(count) + rng.random(count)) / count)
    through = wall_gain(hz, walls) / (1 + len(walls))
    boost_db = 20 * np.log10(through) * (hz < 6000)
    level_db = along(tone, hz) + 10 * np.log10(hz / 3000) + boost_db
    return np.transpose([hz, level_db, np.full(count, .03)])


def digs(rows, sink_s, sink_db, fade_db_per_s, dulls):
    spans = []
    for s, go, end, db, up in rows:
        fade_db = fade_db_per_s * (end - go)
        spans.append([(s, db - sink_db, db + up - sink_db), (min(s + sink_s, go), db, db + up),
                      (go, db, db + up), (end, db - fade_db, db + up - dulls * fade_db)])
    return spans


def effort(curves, knock_db, steel_db):
    return [[(s, db + knock_db, db + steel_db) for s, db in rows] for rows in curves]


def chattering(rows, chatter_s, gain_db):
    return [(s, db + gain_db, tick_db, chatter_s) for s, db, wall_hz, steel_hz, tick_db in rows]


def stir(spans, tone, parts=(), walls=(), *, rate, spread_db, ring_db=0, ring_rate, odd_db, pan_db):
    out, (knock, tick) = np.zeros((2, N)), halves(tone, 2400, walls)
    rest = (0, SR // 8)
    for rows in spans:
        s, low_db, high_db = np.transpose(rows)
        t = np.arange(s[0], s[-1], 1 / SR)
        crowd = contacts(len(t), rate, spread_db) * clumps(len(t), rate=60, depth_db=2.0)
        hits = np.pad(unit(crowd), rest)
        low, high = (np.pad(gain_from_db(np.interp(t, s, db)), rest) for db in (low_db, high_db))
        x = signal.fftconvolve(hits * low, knock) + signal.fftconvolve(hits * high, tick)
        x = x[:len(hits)]
        modes = [(hz, ring_db + db, t60) for hz, db, t60 in parts]
        modes += [(hz, odd_db + db, t60) for hz, db, t60 in odd_parts(tone, walls, count=12)]
        for hz, db, t60 in modes:
            sparse = contacts(len(hits), ring_rate, 4.56) * np.sqrt(SR / ring_rate)
            x += gain_from_db(db) * ring(hz, t60, (low if hz < 4000 else high) * sparse)
        add(out, s[0], x, pan_db)
    return out


def blows(rows, tone, parts=(), walls=(), *, lead, knock_db, tick_db, ring_db=0, odd_db, pan_db):
    out, (knock, tick) = np.zeros((2, N)), halves(tone, 3600, walls)
    t = np.arange(SR // 6) / SR - lead
    for s, low_db, high_db, chatter in rows:
        crowd = gain_from_db(np.where(t < 0, 14 * t / (lead + 1e-4), -60 * t / max(chatter, .004)))
        hit = rng.standard_normal(len(t)) * crowd
        hit[np.searchsorted(t, 0)] = 4
        hit /= np.linalg.norm(hit)
        response = gain_from_db(low_db + knock_db) * knock + gain_from_db(high_db + tick_db) * tick
        x = signal.fftconvolve(hit, response)[:len(t)]
        for hz, db, t60 in parts:
            x += gain_from_db(high_db + ring_db + db + rng.normal(0, 2.2)) * ring(hz, t60, hit)
        for hz, db, t60 in odd_parts(tone, walls, count=6):
            drive_db = low_db if hz < 4000 else high_db + 7.5
            x += gain_from_db(drive_db + odd_db + db) * ring(hz, t60, hit)
        add(out, max(s - lead + .002, 0), x, pan_db + rng.normal(0, .5))
    return out


def clinks(rows, wall_db, wall_t60, steel_db, steel_t60, crack_db, pan_db):
    out, t = np.zeros((2, N)), np.arange(SR // 10) / SR

    def note(hz, t60, u):
        neighbour = np.sin(2 * np.pi * (hz * (1 + 0.097 * u) * t + u))
        return decay(t, t60) * (sine(hz, t) + 0.81 * neighbour)

    for (s, db, wall_hz, steel_hz, tick_db), u in zip(rows, rng.standard_normal((len(rows), 4))):
        crack = np.diff(rng.standard_normal(len(t) + 1)) * gain_from_db(tick_db + crack_db) * decay(t, 0.0067)
        wall = gain_from_db(db + wall_db) * note(wall_hz, wall_t60 * gain_from_db(2 * u[0]), u[1])
        steel = gain_from_db(tick_db + steel_db) * note(steel_hz, steel_t60, u[2])
        add(out, s, (wall + steel + crack) * onset(t, 0.00033), pan_db + .5 * u[3])
    return out


def patchy(x, depth_db):
    z = signal.stft(x, nperseg=512)[2]
    field = uniform_filter1d(rng.standard_normal(z.shape[1:]), size=12, axis=0)
    field = uniform_filter1d(field, size=8, axis=1)
    return signal.istft(z * gain_from_db(depth_db * unit(field)), nperseg=512)[1][:, :N]


def bolt_heap():
    moves = digs(DIGS, sink_s=0.0089, sink_db=3.5, fade_db_per_s=66.0, dulls=1.5)
    moves += swells(HEAP, rise_db=14.5, fall_db=20.0, swing=1.0)
    heap = stir(moves, HEAP_TONE, walls=BIN, rate=4500, spread_db=3.0,
                ring_rate=69, odd_db=-28.5, pan_db=0.46)
    shaken = chattering(CLINKS_A + CLINKS_B, chatter_s=.065, gain_db=-3)
    shaken += chattering(CLINKS_SLIDE, chatter_s=.025, gain_db=-9.5)
    shaken += chattering(CLINKS_HOLLOW, chatter_s=.06, gain_db=8.5)
    heap += blows(shaken, HEAP_TONE, walls=BIN, lead=.012, knock_db=13.0, tick_db=23.0, odd_db=0, pan_db=-0.04)
    return heap + blows(HEAP_STARTS, HEAP_TONE, walls=BIN, lead=0, knock_db=11.5, tick_db=17,
                        odd_db=2.5, pan_db=2.0)


def sliding_bin():
    return stir(effort(SLIDE, knock_db=-10.5, steel_db=-0.5), SLIDE_TONE, walls=BIN[:2], rate=9700,
                spread_db=2.0, ring_rate=220, odd_db=-25.5, pan_db=-1.0)


def dropped_bolts():
    rocking = digs(DROP, sink_s=0.25, sink_db=2.5, fade_db_per_s=95.0, dulls=1.52)
    bolts = stir(rocking, DROP_TONE, LONG_BOLTS, rate=10000, spread_db=0.5, ring_db=-26.5,
                 ring_rate=220, odd_db=-30.5, pan_db=0.5)
    landings = [(s, db, tick_db, .032) for s, db, tick_db in LONG_BLOWS]
    return bolts + blows(landings, DROP_TONE, LONG_BOLTS, lead=.002, knock_db=12.5, tick_db=20.0,
                         ring_db=6.5, odd_db=-11.5, pan_db=-1.0)


def held_bolts():
    held = stir(swells(ROLL, rise_db=6, fall_db=-1.5, swing=1.5), HEAP_TONE, HELD_BOLTS, rate=3700,
                spread_db=2.0, ring_db=-1.0, ring_rate=1500, odd_db=-35.5, pan_db=0.5)
    return held + blows(HELD_BLOWS, DROP_TONE, HELD_BOLTS, lead=0, knock_db=-6, tick_db=15,
                        ring_db=14.0, odd_db=-8.5, pan_db=2.0)


def picked_washers():
    pick = stir(effort(PICK, knock_db=-.5, steel_db=-2), PICK_TONE, walls=BIN[1:2], rate=3700,
                spread_db=1.5, ring_rate=53, odd_db=-36, pan_db=1.5)
    shaken = chattering(CLINKS_PICK[:-1], chatter_s=0.025, gain_db=-1.5)
    return pick + blows(shaken, PICK_TONE, walls=BIN, lead=0.0034, knock_db=7.5, tick_db=20.5,
                        odd_db=-9.5, pan_db=0.5)


def bins_set_down():
    return blows(SET_DOWN, SET_TONE, lead=0, knock_db=11.0, tick_db=21.0, odd_db=4.0, pan_db=1.5)


def single_clinks():
    single = clinks(CLINKS_A + CLINKS_B, wall_db=-7, wall_t60=.028, steel_db=2, steel_t60=.015,
                    crack_db=0.5, pan_db=0.7)
    single += clinks(CLINKS_HOLLOW, wall_db=-1.0, wall_t60=0.06, steel_db=-3, steel_t60=0.049,
                     crack_db=-7.5, pan_db=0.44)
    single += clinks(CLINKS_SLIDE, wall_db=-8.5, wall_t60=0.041, steel_db=1, steel_t60=0.022,
                     crack_db=-2.0, pan_db=-0.8)
    return single + clinks(CLINKS_PICK, wall_db=-10.5, wall_t60=0.017, steel_db=-1, steel_t60=0.039,
                           crack_db=-1, pan_db=0.9)


def hardware():
    crowd = patchy(bolt_heap() + sliding_bin() + picked_washers(), depth_db=1.74)
    return crowd + dropped_bolts() + held_bolts() + bins_set_down() + single_clinks()


def scene():
    near, close = hardware() + loose_parts(), taps()
    mono, close_mono = near.mean(0), close.mean(0)
    room = gain_from_db(-8.5) * shop(mono + gain_from_db(-6.5) * close_mono)
    return near + close + close_echoes(mono) + room + bench() + sleeves() + air()


def band_limit(x):
    return signal.sosfilt(signal.butter(12, 16880, fs=SR, output="sos"), x)


def record(dry):
    x = signal.sosfilt(signal.butter(2, 82, "high", fs=SR, output="sos"), dry)
    x = signal.sosfilt(signal.cheby2(12, 34, 16150, fs=SR, output="sos"), x)
    x = x / (1 + np.abs(x / .93) ** 6) ** (1 / 6)
    return band_limit(x)


dry = scene()
out = record(dry)
digitize_waveform(out)
```